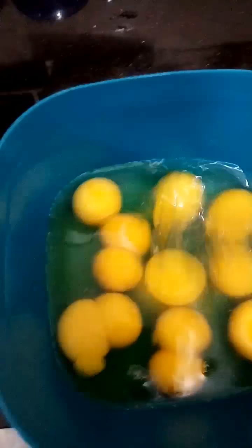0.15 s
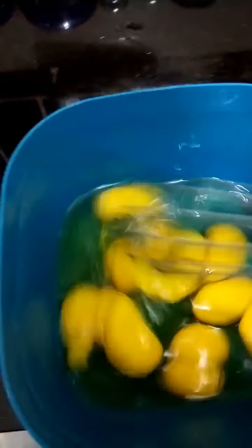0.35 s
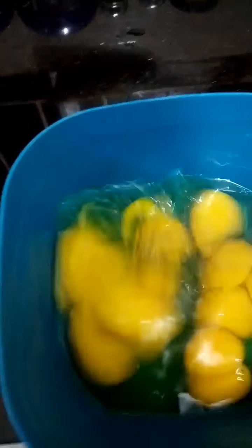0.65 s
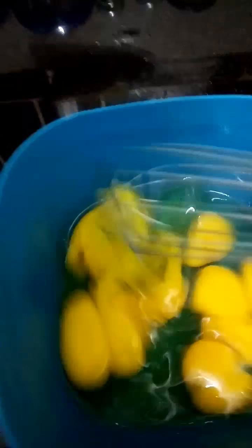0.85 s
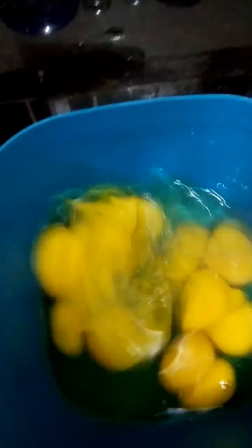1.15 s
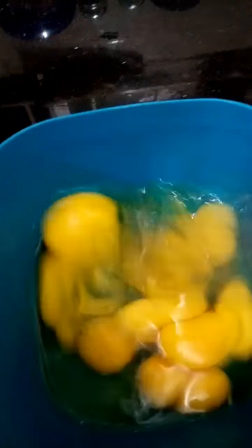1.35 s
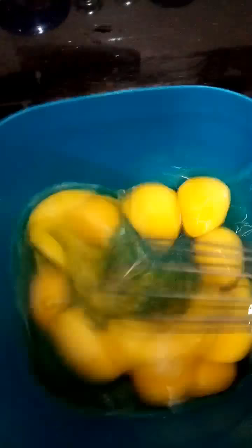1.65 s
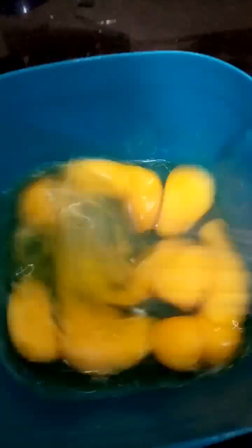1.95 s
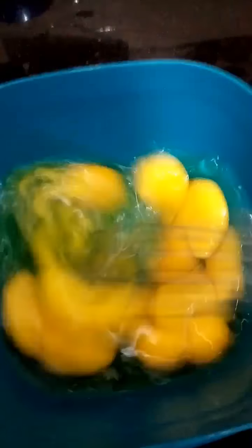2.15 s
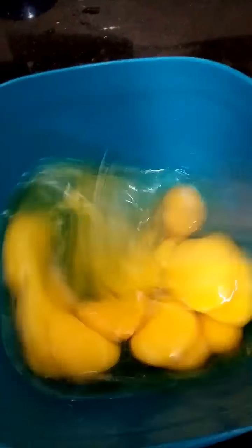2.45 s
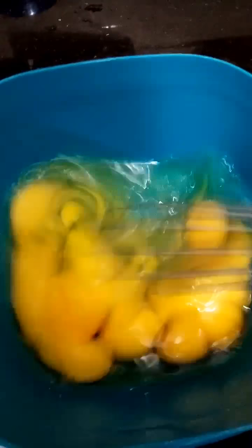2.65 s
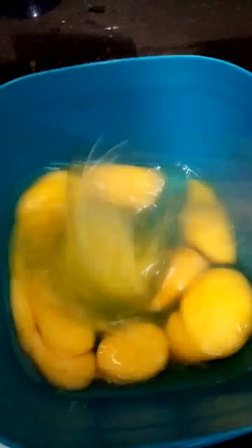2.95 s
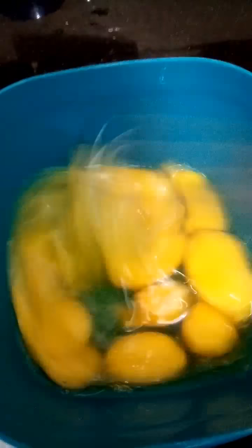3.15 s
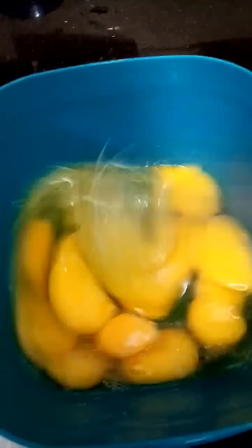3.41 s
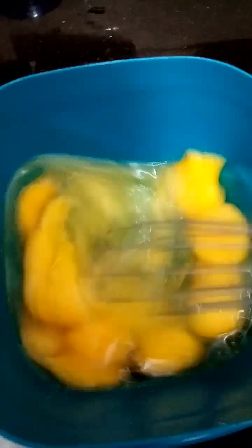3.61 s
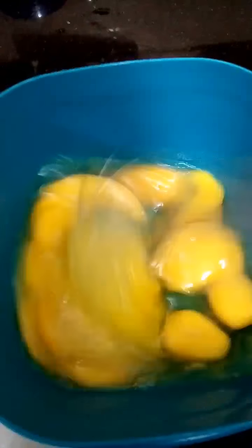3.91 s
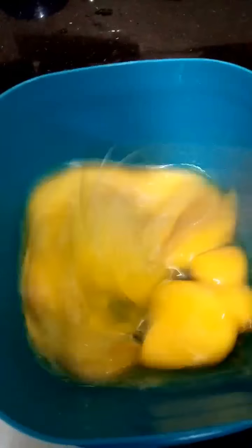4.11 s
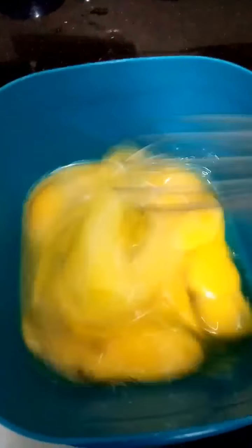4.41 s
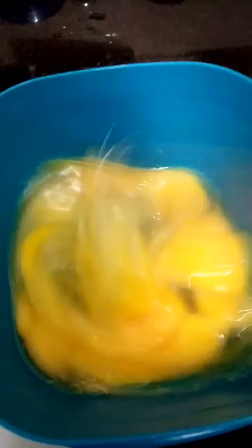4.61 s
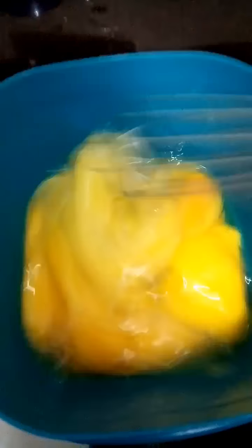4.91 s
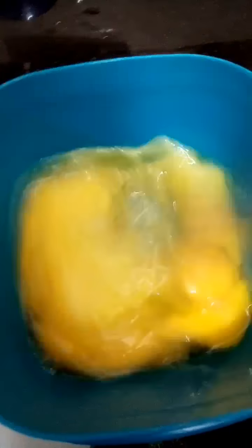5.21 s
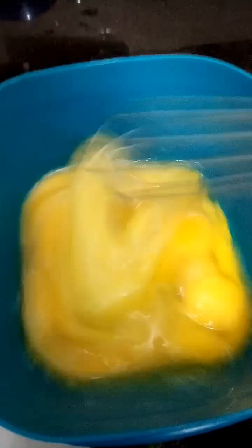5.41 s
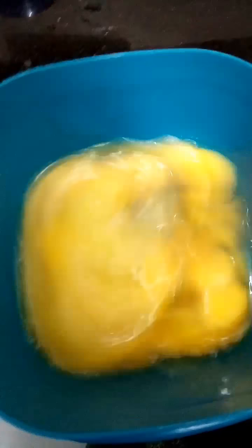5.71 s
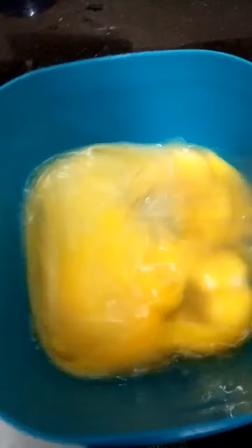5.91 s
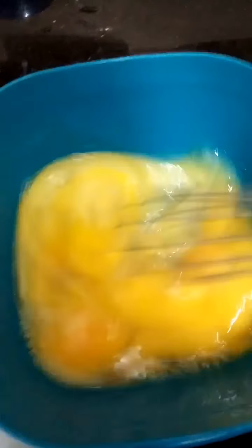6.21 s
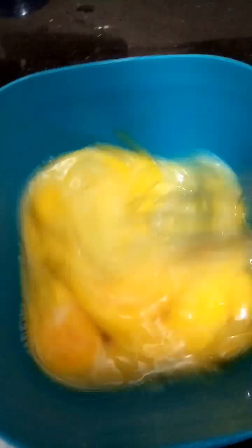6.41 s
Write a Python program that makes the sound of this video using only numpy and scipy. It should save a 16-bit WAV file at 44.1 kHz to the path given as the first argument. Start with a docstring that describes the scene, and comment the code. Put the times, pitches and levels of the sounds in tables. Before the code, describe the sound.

A wire whisk beats raw eggs in a plastic bowl, about four wet, snapping strokes a second with hollow knocks, close up in a kitchen.

```python
"""Whisking eggs in a plastic bowl

A wire whisk beats raw eggs about four strokes a second, close to the microphone in a kitchen.
Wires knock the bowl (damped modes) or tear the egg with a wet snap (noise burst and short ring);
trapped air rings as rising sines, and lifted egg splats back as filtered grains and tiny pops.
The held bowl bumps softly on the counter; a noise-built room echo answers over a steady hush."""
import sys
import numpy as np
from scipy import signal
from scipy.fft import rfft, irfft, next_fast_len
from scipy.io import wavfile
from scipy.ndimage import map_coordinates

SR = 44100
rng = np.random.default_rng(int(sys.argv[2]) if len(sys.argv) > 2 else 0)


def waveform_to_disk(signal):
    """Save audio, clipped to [-1, 1], as 16-bit WAV at the path in sys.argv[1]."""
    frames = np.transpose(np.atleast_2d(signal))
    scaled = np.clip(frames, -1, 1) * 32767
    samples = np.round(scaled).astype(np.int16)
    wavfile.write(sys.argv[1], SR, samples)


N = 289296
T = np.arange(SR // 5) / SR  # time inside one event, s

# Wires hit the bowl. Each row: start in seconds, relative level in dB, pitch of the favoured modes in Hz.
KNOCKS = [(0.151, -23.5, 730), (0.952, -31.5, 700), (1.119, -25.5, 810), (1.197, -35.5, 835),
          (1.352, -20, 606), (1.575, -16.5, 1080), (1.672, -28, 745), (1.9055, -29, 865), (2.319, -17, 600),
          (2.5473, -17, 590), (3.027, -25, 830), (3.257, -21, 611), (4.256, -36.5, 600), (4.7097, -25, 890),
          (4.994, -37, 600), (5.488, -34, 796), (6.1872, -31, 945), (6.378, -16.5, 614)]
# Lifted egg falls back. Each row: start in seconds, relative level in dB, length scale in seconds.
SPLATS = [(0.171, -27.5, 0.025), (0.96, -36.5, 0.013), (1.216, -41, 0.0097), (1.688, -36.5, 0.015),
          (1.906, -28, 0.014), (2.154, -34, 0.014), (2.177, -34.5, 0.019), (2.38, -29, 0.018),
          (2.613, -29, 0.023), (2.833, -30, 0.038), (3.068, -26.5, 0.023), (3.288, -37, 0.013),
          (3.325, -26.5, 0.016), (3.56, -28.5, 0.035), (3.77, -29.5, 0.026), (3.805, -27, 0.016),
          (4.037, -27, 0.02), (4.2883, -27, 0.012), (4.527, -26, 0.022), (4.771, -24.5, 0.015),
          (5.015, -26.5, 0.019), (5.2564, -26, 0.011), (5.502, -23.5, 0.017), (5.715, -31, 0.019),
          (5.737, -27.5, 0.015), (5.968, -27.5, 0.023), (6.209, -30, 0.02), (6.412, -26, 0.042)]
# Spectrum of wet crackle. Each row: frequency in Hz, relative gain in dB.
CRACKLE = [(300, 0.5), (1500, -2), (2100, -6), (2850, 1.5), (3900, -5.5), (5200, 2.5), (6500, -1),
           (9000, -1.5), (16000, -7)]


def amp(db):
    """Decibels to gain."""
    return 10 ** (np.asarray(db) / 20)


def along(points, hz):
    """Interpolate (Hz, value) points on a log-frequency axis."""
    point_hz, value = np.transpose(points)
    return np.interp(np.log(hz + 1), np.log(point_hz), value)


def coloured(x, spectrum):
    """Causal minimum-phase filter with the given (Hz, dB) spectrum, by folding the cepstrum."""
    size = next_fast_len(len(x) + 8192) * 2
    gain = amp(along(spectrum, np.fft.rfftfreq(size, 1 / SR)))
    cepstrum = irfft(np.log(gain))
    cepstrum[1:size // 2] *= 2
    cepstrum[size // 2 + 1:] = 0
    response = np.exp(rfft(cepstrum))
    return irfft(rfft(x, size) * response, size)[:len(x)]


def fade(t60_s):
    """Exponential decay by 60 dB in t60_s."""
    return np.exp(-np.log(1000) * T / t60_s)


def sine(hz):
    """Steady sine as long as one event."""
    return np.sin(2 * np.pi * hz * T)


def noise():
    """White noise as long as one event."""
    return rng.standard_normal(len(T))


def normed(x):
    """x with energy 1."""
    return x / np.sqrt(np.sum(x ** 2) + 1e-20)


def add(track, start_s, x, db):
    """Mix x in at start_s; db is the rms it would have if packed into 10 ms."""
    start = max(round(start_s * SR), 0)
    part = track[start:start + len(T)]
    event = amp(db) * np.sqrt(SR / 100) * normed(x)
    part += event[:len(part)]


def impulse(scatter_db, t60_s):
    """One sharp contact plus a decaying noise scatter."""
    x = amp(scatter_db) * normed(noise() * fade(t60_s))
    x[0] += 1
    return x


def grains(rate_hz, spread_db):
    """Random tiny impulses of either sign and uneven size, rate_hz a second on average."""
    hits = rng.random(len(T)) < rate_hz / SR
    sign = rng.choice([-1, 1], len(T))
    return hits * sign * amp(spread_db * np.clip(noise(), -2, 2))


def rebound(x, delay_s, share):
    """x followed by a weaker, inverted repeat."""
    return x - share * np.interp(T - delay_s, T, x, left=0)


def bowl_ring(spot_hz):
    """The struck filled bowl rings in modes damped by the egg; the spot favours those near its pitch."""
    # Each row: frequency in Hz, relative level in dB, t60 in seconds.
    modes = [(226, -23, 0.18), (330, -9.5, 0.33), (446, -24.5, 0.26), (602, 2, 0.12), (758, 9.5, .05),
             (872, 3.5, 0.07), (1055, 5, 0.069), (1290, -36, .045), (1494, 6.5, 0.015)]
    favour_db, favour_octaves = 5.5, 0.13
    ring = np.zeros(len(T))
    for hz, level_db, t60_s in modes:
        favour = favour_db * np.exp(-(np.log2(hz / spot_hz) / favour_octaves) ** 2)
        level = amp(level_db + favour + rng.normal(0, 3))
        ring += level * fade(t60_s) * sine(hz * rng.normal(1, 0.015))
    return ring


def knocks(ring_db=-1, wall_db=0):
    """Wires or falling egg strike the bowl and rebound: wall push, modal ring and bright click."""
    # Push on the wall. Each row: frequency in Hz, relative gain in dB.
    push_spectrum = [(60, -65), (250, -13), (450, -2), (650, 7), (1050, 0.5), (1500, -18), (2100, -48),
                     (5000, -13.5), (12000, -40)]
    # A wire's click. Each row: frequency in Hz, relative gain in dB.
    click_spectrum = [(300, -49), (1500, 13), (2100, 4), (2800, 11.5), (4000, 0), (5200, 10), (6500, 3.5),
                      (9000, -0.5), (16000, -11)]
    # the click grows more slowly than the knock
    click_db, hard_knock_db, click_db_per_db = -24, -15, 0.79
    # the bulk of a fall lands just after its first strands, on the bowl's floor
    bulk_after_s, bulk_db, floor_hz = 0.005, -6, 910
    out = np.zeros(N)
    landings = [(s + bulk_after_s, db + bulk_db, floor_hz) for s, db, _ in SPLATS]
    for start_s, db, spot_hz in KNOCKS + landings:
        delay_s = 0.00425 * (1 + 0.028 * rng.standard_normal())
        push = coloured(impulse(scatter_db=-2.5, t60_s=0.014), push_spectrum)
        push = rebound(push, delay_s, share=0.87)
        body = normed(push) + amp(ring_db) * normed(bowl_ring(spot_hz))
        add(out, start_s, body, db + wall_db)
        click = rebound(impulse(scatter_db=16, t60_s=0.044), delay_s, share=0.31)
        level_db = click_db + click_db_per_db * (db - hard_knock_db)
        add(out, start_s, coloured(click, click_spectrum), level_db)
    return out


def snaps(snap_db=0, ring_share=0.89, ring_t60_s=0.0018):
    """A film bursts in a bright crack and a brief ring that bounces once; a last strand parts later."""
    # Films of egg. Each row: start in seconds, relative level in dB, ring pitch in Hz.
    films = [(0.1733, -28.5, 5900), (0.654, -29, 5200), (0.907, -41, 6160), (0.952, -31, 4200),
             (1.142, -35, 4870), (1.146, -28, 6800), (1.621, -32, 6200), (1.856, -35.5, 5670),
             (1.9066, -29, 5400), (2.119, -26, 5900), (2.154, -29, 5070), (2.356, -28, 5100),
             (2.384, -32.5, 3720), (2.808, -27, 5900), (2.835, -43, 5650), (3.049, -23, 4740),
             (3.29, -26, 4960), (3.536, -29, 3020), (4.0131, -29, 5700), (4.501, -37.5, 5240),
             (4.743, -23.5, 5900), (4.984, -20, 7660), (5.226, -29.5, 6250), (5.2615, -31, 4940),
             (5.482, -35, 6900), (5.951, -23, 6700), (6.1922, -20.5, 6160)]
    strand_db = -19.5
    out = np.zeros(N)
    strands = [(s + rng.uniform(0.008, 0.022), db + strand_db, hz) for s, db, hz in films]
    for start_s, db, hz in films + strands:
        crack = coloured(impulse(scatter_db=8, t60_s=0.0072), CRACKLE)
        ring = (1 - np.exp(-T / 0.00013)) * fade(ring_t60_s) * sine(hz)
        ring = rebound(ring, rng.uniform(0.00068, 0.0019), share=0.25)
        add(out, start_s, normed(crack) + ring_share * normed(ring), db + snap_db)
    return out


def splashes(crackle_db=1.02, slap_db=1.5):
    """Rows of (s, crackle dB, slap dB, length s): falls, their late tails and wires dragging after knocks."""
    tail_after_s, tail_s, tail_db = 0.044, 0.015, -14.5
    drag_after_s, drag_s, drag_crackle_db, drag_slap_db = 0.018, 0.034, -14.5, -18
    tails = [(s + tail_after_s + rng.normal(0, 0.003), db + tail_db, tail_s) for s, db, _ in SPLATS]
    falls = [(s, db + crackle_db, db + slap_db, length_s) for s, db, length_s in SPLATS + tails]
    drags = [(s + drag_after_s, db + drag_crackle_db, db + drag_slap_db, drag_s) for s, db, _ in KNOCKS]
    return falls + drags


def splats(wet_moments):
    """Strands of egg land one after another: ticks and tiny pops over a softer slap on the pool."""
    # Slap of egg. Each row: frequency in Hz, relative gain in dB.
    slap_spectrum = [(50, -57), (140, -6), (230, -0.5), (420, -7), (600, -4), (850, 6), (1100, -7.5),
                     (1500, -8), (2200, -19), (6000, -94)]
    out = np.zeros(N)
    for start_s, crackle_db, slap_db, length_s in wet_moments:
        landing = (1 - np.exp(-T / 0.0008)) * np.exp(-(T / (1.2 * length_s)) ** 1.54)
        ticks = grains(rate_hz=1900, spread_db=4.0) * landing
        popping = pops(landing ** 2, ring_t60_s=0.006, spread_db=5.5, count=18)
        wet = normed(ticks) + 0.85 * normed(popping)
        add(out, start_s, coloured(wet, CRACKLE), crackle_db)
        slap = grains(rate_hz=1300, spread_db=2.5) * landing
        add(out, start_s, coloured(slap, slap_spectrum), slap_db)
    return out


def pops(landing, ring_t60_s, spread_db, count):
    """Tiny films burst at random moments of a landing, each ringing very briefly at its own pitch."""
    starts = rng.choice(len(T), count, p=landing / landing.sum())
    hz = rng.uniform(1400, 8000, (count, 1))
    size = amp(spread_db * np.clip(rng.standard_normal((count, 1)), -2, 2))
    life = np.arange(SR // 100)  # samples in one pop
    waves = size * fade(ring_t60_s)[life] * np.sin(2 * np.pi * hz * T[life])
    places = starts[:, None] + life
    return np.bincount(places.ravel(), waves.ravel(), len(T))[:len(T)]


def bubble(hz, t60_s, glide, flutter_db=1.5, flutter_hz=350):
    """An air pocket rings and climbs (glide in octaves/s) nearing the surface; moving egg makes it flutter."""
    pitch_hz = hz * 2 ** np.minimum(glide * T, 1.2)
    swell = 1 - np.exp(-T * hz / 0.97)
    wander = map_coordinates(rng.standard_normal(256), [T * flutter_hz], order=1)
    flutter = amp(flutter_db * wander)
    return swell * flutter * fade(t60_s) * np.sin(2 * np.pi * np.cumsum(pitch_hz) / SR)


def bubbles(bubble_db=3.0, tick_db=-9):
    """Air pockets opened by the wires: a wet tick, then a ring that lasts longer the bigger the pocket."""
    # Each row: start in seconds, relative level in dB, starting pitch in Hz, upward glide in octaves/s.
    pockets = [(0.152, -27.5, 735, 3), (0.176, -28, 880, 0.77), (0.21, -36.5, 300, 1),
               (0.597, -49, 1980, 12), (0.654, -37.5, 1450, 13), (0.955, -29, 713, 1.1),
               (1.142, -32.5, 2764, 12), (1.689, -37.5, 2670, 14), (2.118, -36.5, 1370, 26),
               (2.32, -22, 593, 1.1), (2.808, -33.5, 1610, 20), (3.0507, -17, 784, 39.4),
               (3.075, -36.5, 1350, 16), (3.163, -42, 1790, 17), (3.534, -28.5, 2850, 14),
               (3.786, -34.5, 2530, 9.5), (3.812, -33.5, 859, 3.2), (4, -39.5, 5970, 4.1),
               (4.013, -33, 1366, 29), (4.242, -44, 2630, 12), (4.425, -53, 2780, 11),
               (4.619, -40.5, 1830, 7.5), (4.7421, -27, 1573, 24), (4.984, -34, 1690, 12),
               (5.225, -36, 3000, 12), (5.456, -52, 2530, 12), (5.952, -35, 2580, 14),
               (6.096, -49, 5150, 12), (6.19, -21.5, 926, 1.7), (6.206, -31, 327, 1.4)]
    large_t60_s, small_t60_s, middle_hz = 0.075, 0.016, 1130
    out = np.zeros(N)
    for start_s, db, hz, glide in pockets:
        t60_s = small_t60_s + (large_t60_s - small_t60_s) / (1 + (hz / middle_hz) ** 5)
        add(out, start_s, bubble(hz, t60_s, glide), db + bubble_db)
        tick = coloured(impulse(scatter_db=19, t60_s=0.0058), CRACKLE)
        add(out, start_s, tick, db + tick_db - 10 * np.log10(t60_s / small_t60_s))
    return out


def froth(wet_moments, froth_db=-10, count=3):
    """Every splash folds in a few tiny bubbles of random size; the small ones die soonest."""
    out = np.zeros(N)
    for start_s, db, _, length_s in wet_moments:
        for when, size, weakness in rng.random((count, 3)):
            hz = 1300 * 5 ** size
            level_db = db + froth_db - 9 * weakness - 4 * when
            add(out, start_s + length_s * when, bubble(hz, 40 / hz, 32), level_db)
    return out


def bumps(bump_db=-1):
    """The held bowl thuds dully on the counter, gone in a few cycles; a softer, lower settling answers."""
    # Each row: start in seconds, relative level in dB, pitch in Hz.
    contacts = [(0.757, -40, 122), (0.828, -35, 123), (0.899, -37.5, 92), (2.643, -35.5, 105.6),
                (2.803, -40, 101), (4.233, -35, 100), (6.027, -32.5, 96)]
    # Scuff of a bump. Each row: frequency in Hz, relative gain in dB.
    thud_spectrum = [(20, -30), (50, -6), (90, 0), (135, -3.5), (200, -11), (400, -22), (1500, -69),
                     (6000, -74)]
    settle_after_s, settle_db, settle_pitch_ratio = 0.0216, -6.5, 0.79
    out = np.zeros(N)
    settles = [(s + settle_after_s, db + settle_db, hz * settle_pitch_ratio) for s, db, hz in contacts]
    for start_s, db, hz in contacts + settles:
        rock = (1 - np.exp(-T / 0.0039)) * fade(3.2 / hz) * sine(hz)
        scuff = coloured(noise() * fade(0.064), thud_spectrum)
        add(out, start_s, 0.62 * normed(scuff) - normed(rock), db + bump_db)
    return out


def kitchen(x, near_db=-11, room_db=-13.0):
    """Quick reflections off bowl and counter, then the room's tail: noise redrawn every 1/12 s, crossfaded."""
    # Reverberation. Each row: frequency in Hz, t60 in seconds.
    decay = [(150, 0.98), (900, 0.46), (2500, 0.34), (6000, 0.46), (15000, 0.42)]
    out = np.zeros(N + 2 * SR)
    hop = SR // 12
    for start in range(0, N, hop):
        hz, t, z = signal.stft(rng.standard_normal(SR // 2), SR, nperseg=256)
        z = z * np.exp(-np.log(1000) * t / along(decay, hz)[:, None])
        tail = signal.istft(z, SR, nperseg=256)[1]
        tail *= 1 - np.exp(-np.arange(len(tail)) / SR / 0.0023)
        echo = amp(room_db) * normed(tail)
        near = noise() * fade(0.068) * (T > 0.001)
        echo[:len(T)] += amp(near_db) * normed(near)
        piece = x[start:start + 2 * hop]
        window = np.sin(np.pi * np.arange(len(piece)) / (2 * hop))
        wet = signal.fftconvolve(piece * window, echo)
        out[start:start + len(wet)] += wet
    return out[:N]


def hush(hush_db=-48.0):
    """Steady kitchen background: filtered noise at a set rms."""
    # Each row: frequency in Hz, relative gain in dB.
    hush_spectrum = [(20, -18), (45, -6.5), (80, 0.5), (200, 0.5), (400, -2.5), (800, -5), (1300, -8.5),
                     (2300, -17), (4000, -19.5), (6500, -21), (16000, -36.5)]
    x = coloured(rng.standard_normal(N), hush_spectrum)
    return amp(hush_db) * x / np.std(x)


def scene():
    """The whisking, its echo and the background."""
    # Weak bass radiation of small splashes and knocks. Each row: frequency in Hz, gain in dB.
    radiation = [(20, -34), (70, -18), (140, -9), (220, 0)]
    wet_moments = splashes()
    egg = snaps() + splats(wet_moments) + bubbles() + froth(wet_moments)
    whisking = coloured(knocks() + egg, radiation) + bumps()
    return (whisking + kitchen(whisking) + hush())[None]


def record(dry):
    """A small microphone with dull treble, a port resonance and a band limit."""
    # Each row: frequency in Hz, gain in dB.
    response = [(6700, -0.5), (7500, -7), (8500, -16), (10200, -13.5), (12000, -17), (13800, -15.5),
                (14700, 0), (15250, -2.5), (15800, -25)]
    top_hz = 16600
    x = coloured(dry[0], response)
    size = next_fast_len(N + 8192)
    passed = np.fft.rfftfreq(size, 1 / SR) < top_hz
    return irfft(rfft(x, size) * passed, size)[None, :N]


dry = scene()
out = record(dry)
waveform_to_disk(out)
```